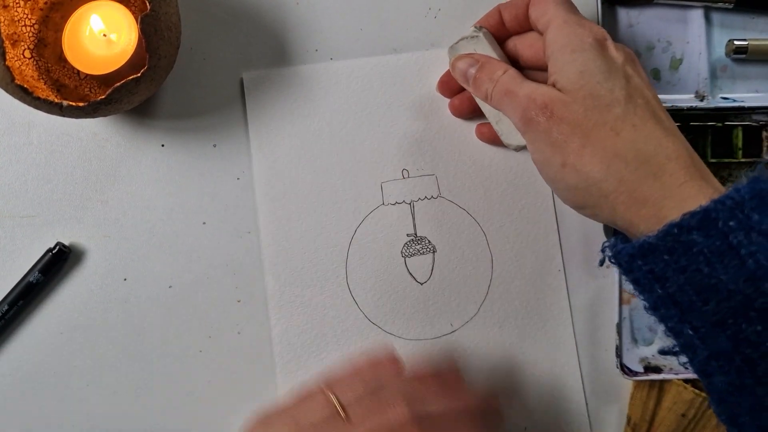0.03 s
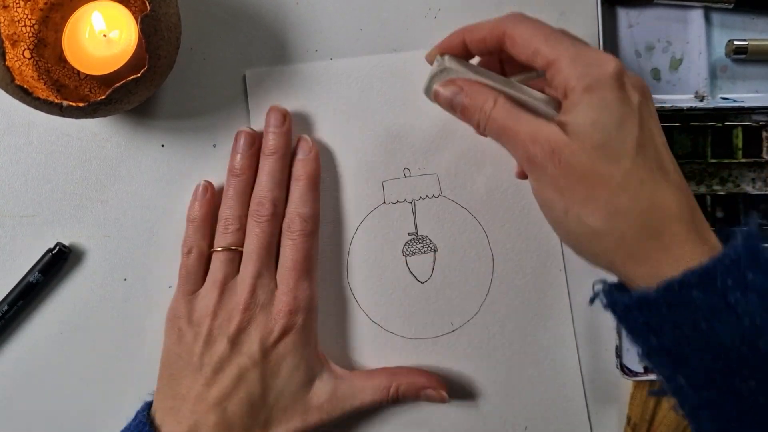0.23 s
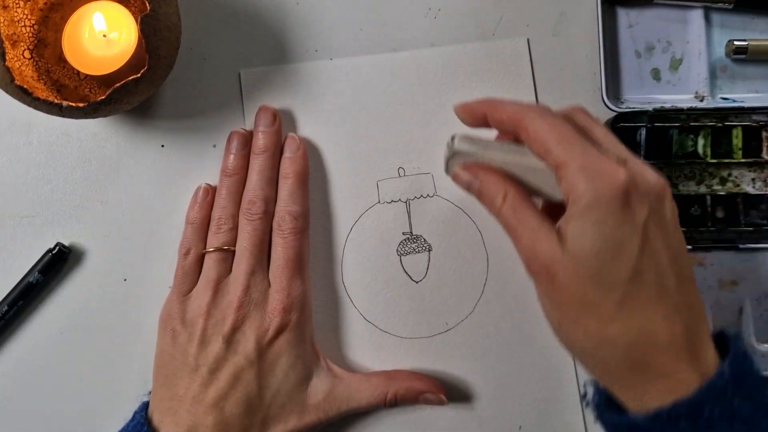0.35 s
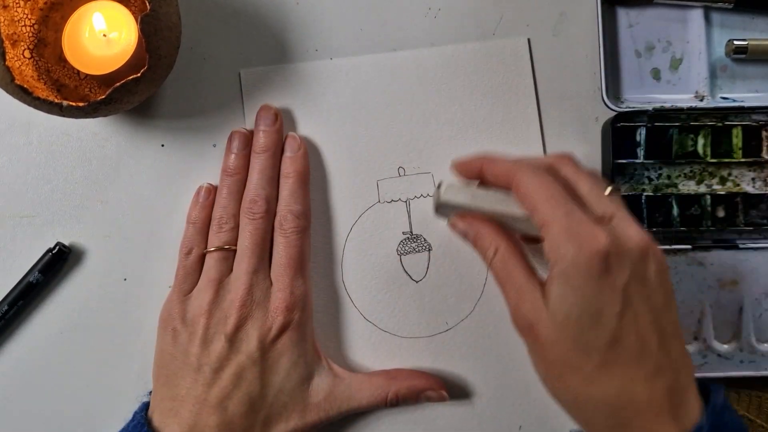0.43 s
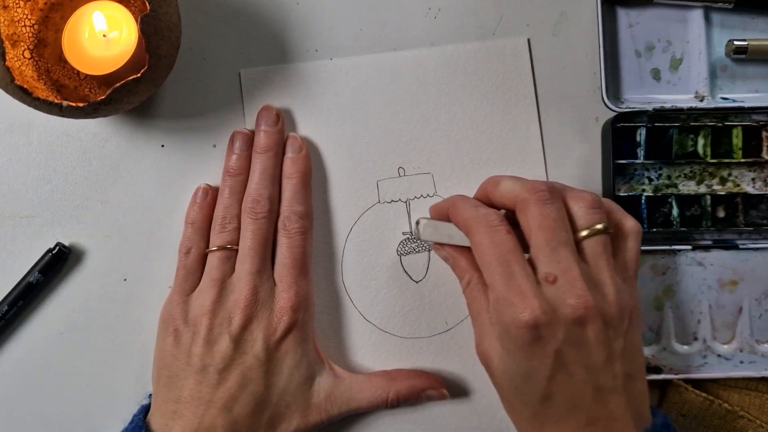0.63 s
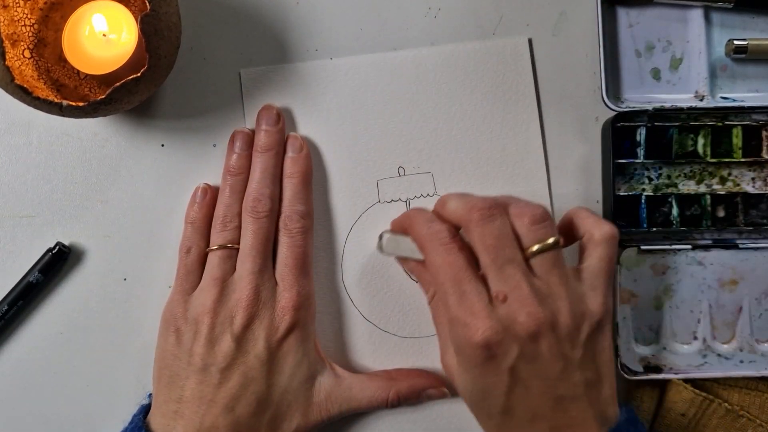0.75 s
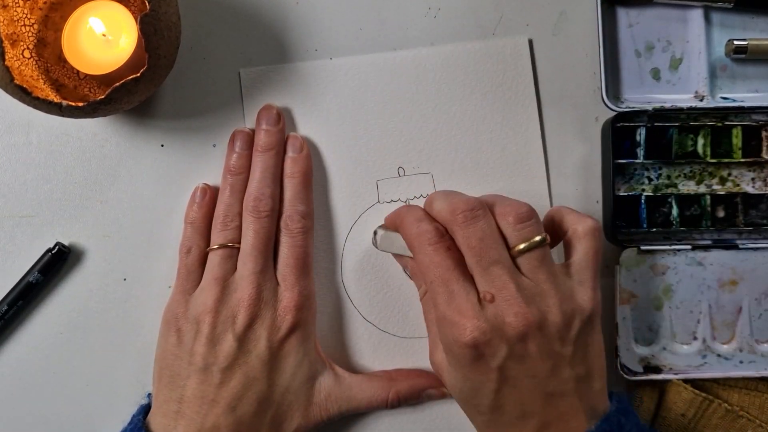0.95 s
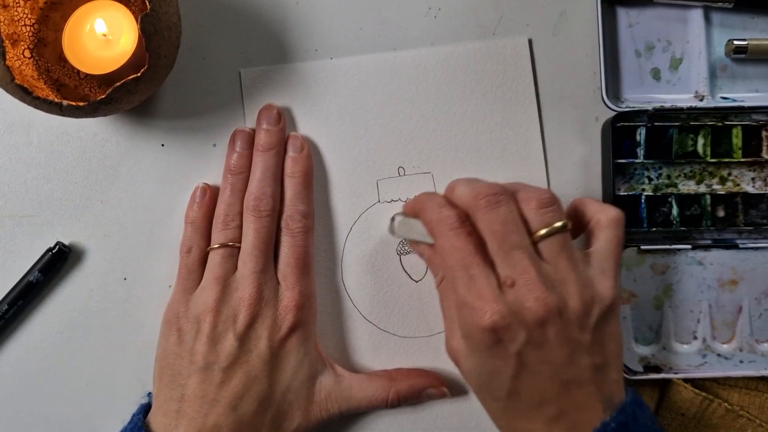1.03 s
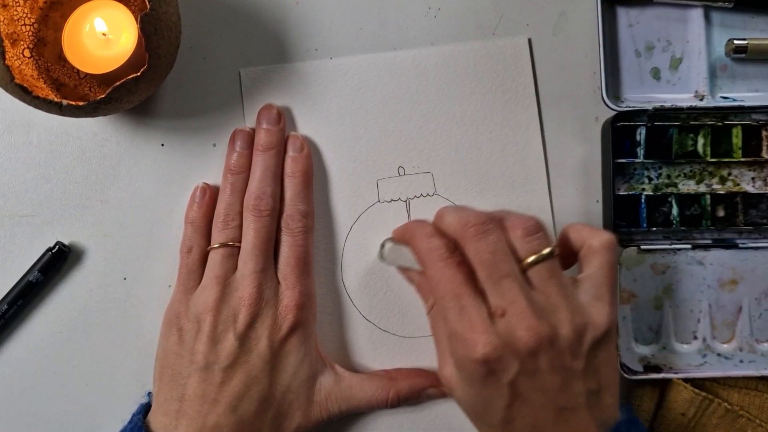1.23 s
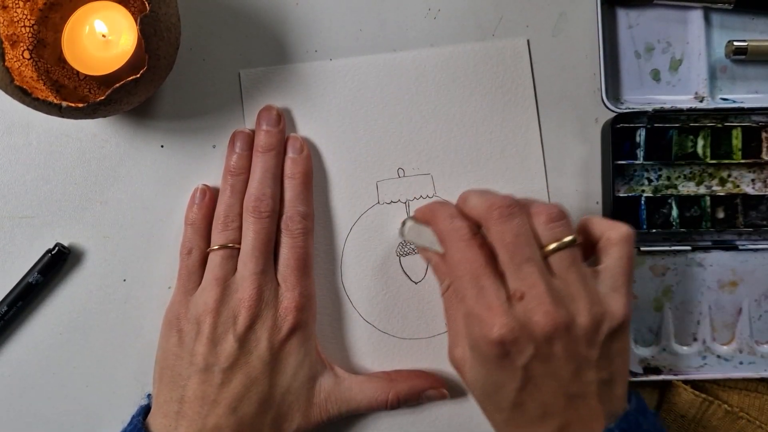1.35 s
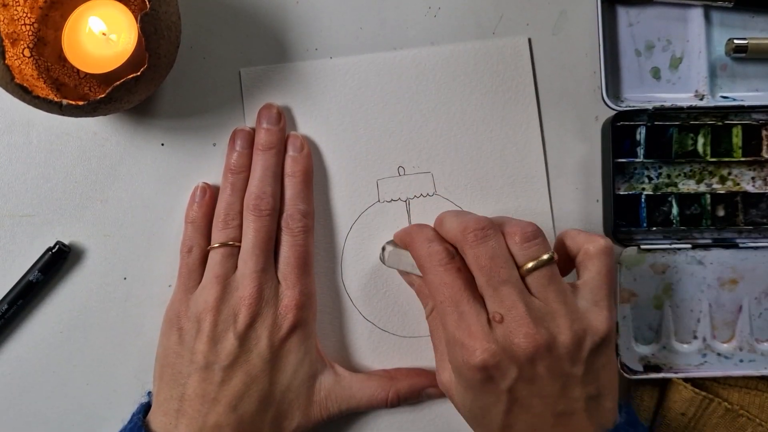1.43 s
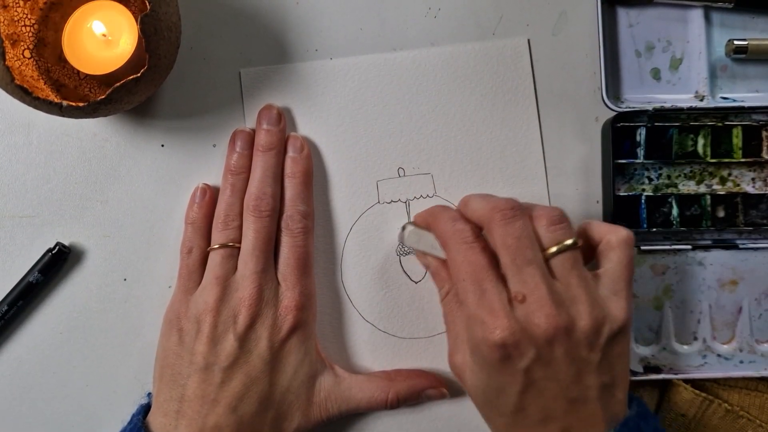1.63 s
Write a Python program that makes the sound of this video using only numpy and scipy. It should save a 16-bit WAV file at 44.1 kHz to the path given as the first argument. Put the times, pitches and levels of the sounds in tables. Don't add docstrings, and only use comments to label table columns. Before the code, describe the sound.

An eraser rubs thick paper, close up in a quiet furnished room with faint low noise. After near silence, a brief scuff leads to a sharp, ringing knock on the desk at 0.24 s, with a weaker bounce at 0.31. A hand scuffs paper at 0.44. From 0.65 to 1.66, short soft hisses alternate bright and dull, with paper rustle, ticks, low desk thumps and a faint creak around 1.4.

```python
import sys
import numpy as np
from scipy import signal
from scipy.fft import rfft, irfft, next_fast_len
from scipy.io import wavfile
from scipy.ndimage import uniform_filter1d

SR = 44100
rng = np.random.default_rng(int(sys.argv[2]) if len(sys.argv) > 2 else 0)


def dump_mix(stems):
    frames = np.atleast_2d(stems).T
    limited = np.clip(frames, -1, 1)
    pcm = np.round(limited * 32767).astype(np.int16)
    wavfile.write(sys.argv[1], SR, pcm)


def invert_db(x):
    u = np.asarray(x, float) / 20
    return 10 ** u


N = 74970
GRAINS_PER_S = 20000


def rms_one(x):
    return x / np.sqrt(np.mean(x ** 2) + 1e-20)


def even(x, size):
    evenness = 0.4
    power = uniform_filter1d(x ** 2, size) + 1e-3
    return rms_one(x / power ** (evenness / 2))


def at_hz(points, hz):
    table_hz, values = np.transpose(points)
    return np.interp(np.log(hz + 1), np.log(table_hz), values)


def colour(x, spectrum, peaks=()):
    hz = np.arange(N // 2 + 1) * SR / N
    lift = 1 + sum(invert_db(db) / (1 + (2 * (hz - f) / width) ** 2) for f, width, db in peaks)
    return rms_one(irfft(rfft(x) * invert_db(at_hz(spectrum, hz)) * lift, N))


def ring(x, hz, t60):
    radius = invert_db(-60 / (t60 * SR))
    angle = 2 * np.pi * hz / SR
    return signal.lfilter([0, np.sin(angle)], [1, -2 * radius * np.cos(angle), radius ** 2], x + 1e-18)


def click(s, db):
    return invert_db(db) * (np.arange(N) == int(s * SR))


def hump(start, peak, end, db, roundness=0.91):
    phase = np.interp(np.arange(N) / SR, [start, peak, end], [0, np.pi / 2, np.pi])
    return invert_db(db) * np.sin(phase).clip(0) ** roundness


def grains(per_s):
    spread_db = 1.5
    slips = (rng.random(N) < per_s / SR) * rng.choice([-1, 1], N)
    return slips * invert_db(spread_db * np.minimum(rng.exponential(1, N), 5))


def flutter(depth_db, count=300):
    steps = N // count + 2
    return invert_db(depth_db * np.interp(np.arange(N) / count, np.arange(steps), rng.standard_normal(steps)))


def slides(rows, source, split_hz):
    top = signal.sosfiltfilt(signal.butter(3, split_hz, "high", fs=SR, output="sos"), source)
    return sum(hump(start, peak, end, db, roundness=0.7) * (source + (invert_db(bright_db) - 1) * top)
               for start, peak, end, db, bright_db in rows)


def room_echo():
    # (f/Hz, t60/s)
    room_t60 = [(200, 0.4), (1000, 0.3), (3000, 0.23), (12000, 0.12)]
    early_s = 0.0017
    t = np.arange(SR // 2) / SR
    edges = 420 * 2 ** np.arange(0, 5.6, 0.5)
    out = 0
    for low, high in zip(edges, edges[1:]):
        band_pass = signal.butter(2, [low, high], "band", fs=SR, output="sos")
        band = signal.sosfilt(band_pass, rng.standard_normal((2, len(t))))
        out = out + band * 1000. ** (-t / at_hz(room_t60, np.sqrt(low * high)))
    out = out * (1 - np.exp(-t / early_s))
    return out / np.sqrt(np.mean(np.sum(out ** 2, axis=1)))


def place(x, phase, pan, wet_db, room):
    size = next_fast_len(2 * N)
    hz = np.arange(size // 2 + 1) * SR / size
    half = invert_db(at_hz(pan, hz) / 2) * np.exp(0.5j * at_hz(phase, hz))
    paths = np.array([half, 1 / half]) + invert_db(wet_db) * rfft(room, size)
    return irfft(rfft(x, size) * paths, size)[:, :N]


def floor():
    # (f/Hz, level/dB per Hz)
    floor_spectrum = [(59, -28.5), (100, 7.5), (197, -4.5), (365, 0.5), (461, -4.5), (3190, -11),
                      (4290, -17.5), (8640, -27), (16000, -51.5)]
    # (f/Hz, side minus mid/dB)
    floor_side = [(150, -1.5), (400, -3), (1000, 0.5)]
    # (f/Hz, level/dB)
    hum = [(355, -87.5), (1068, -88.5)]
    mid, side = rfft(colour(rng.standard_normal((2, N)), floor_spectrum))
    side = side * invert_db(at_hz(floor_side, np.arange(N // 2 + 1) * SR / N))
    noise = irfft(mid + side * [[1], [-1]], N)
    tones = sum(invert_db(db) * np.sin(2 * np.pi * hz * np.arange(N) / SR) for hz, db in hum)
    return invert_db(-76) * noise + tones


def desk():
    # (t/s, level/dB)
    rumble_level = [(0, -75.5), (.22, -70), (0.269, -51), (0.329, -59.5), (.5, -71.5), (.7, -68.5),
                    (.9, -66.5), (1.1, -70.5), (1.3, -68.5), (1.38, -59.5), (1.53, -72), (1.661, -61.5),
                    (1.7, -60)]
    # (f/Hz, level/dB per Hz)
    rumble_shape = [(7.1, -28), (12, -4.5), (54, 7.5), (65, 5), (86, -9), (130, -25.5), (170, -67.5),
                    (290, -120)]
    # (start t/s, peak t/s, end t/s, level/dB, bass lift/dB)
    shakes = [
        (0.241, 0.252, 0.31, -51.5, -3),
        (0.423, 0.43, 0.79, -71.5, -13),
        (0.677, 0.68, 0.76, -71.5, 1.1),
        (0.799, 0.828, 0.82, -71.5, 5),
        (.92, 0.94, 1.14, -77, -5),
        (1.123, 1.155, 1.207, -62, 6.5),
        (1.305, 1.305, 1.335, -63, 5),
        (1.336, 1.41, 1.483, -63, 2),
        (1.593, 1.598, 1.73, -67.5, -0.5),
        (1.208, 1.223, 1.21, -74, 1.5),
    ]
    # (f/Hz, level/dB per Hz)
    wood_spectrum = [(50, -32.5), (90, -10.5), (175, 3.5), (225, -6), (270, -2), (358, 4.5), (420, -19.5),
                     (900, -86)]
    wood = even(colour(rng.standard_normal(N), wood_spectrum), size=600)
    deep = signal.sosfiltfilt(signal.butter(3, 230, fs=SR, output="sos"), wood)
    shake = sum(hump(start, peak, end, db, roundness=0.8) * (wood + (invert_db(deep_db) - 1) * deep)
                for start, peak, end, db, deep_db in shakes)
    s, db = np.transpose(rumble_level)
    level = invert_db(np.interp(np.arange(N) / SR, s, db))
    mid, side = level * colour(rng.standard_normal((2, N)), rumble_shape)
    return shake + mid + invert_db(-17) * side * [[1], [-1]]


def scuffs():
    # (start t/s, peak t/s, end t/s, level/dB, brightness/dB)
    moves = [
        (0.13, .15, 0.17, -73.5, 14),
        (0.44, 0.443, 0.5, -54, -2.5),
        (.225, .228, 0.26, -56.5, -6.5),
    ]
    # (f/Hz, level/dB per Hz)
    scuff_spectrum = [(500, -19), (1000, 0), (3000, -1), (5000, -5), (9000, -9.5), (13300, -17.5),
                      (16000, -15)]
    # (f/Hz, width/Hz, level/dB)
    scuff_peaks = [(3049, 95, 3), (4660, 220, 6), (6690, 220, 8.5), (13200, 300, 5), (705, 70, 16.5),
                   (1083, 50, 6.5), (5650, 120, 4)]
    return slides(moves, colour(grains(GRAINS_PER_S / 2), scuff_spectrum, scuff_peaks), 7000)


def small_ticks():
    # (t/s, level/dB, f/Hz, t60/s)
    ticks = [(.233, -54, 1850, .009), (.4535, -56, 1100, .012), (.4845, -57, 1550, .012),
             (.5972, -52, 2800, .0015), (.5974, -62, 1120, .02), (.598, -72, 4400, .02),
             (1.116, -49.5, 150, .06), (1.3025, -46, 1336, .03), (1.3026, -54, 420, .012),
             (1.303, -55, 3300, .023), (1.3415, -56, 1560, .03), (1.342, -54, 7250, .0035),
             (1.596, -48, 77, .09), (1.6, -70, 8600, .03)]
    return sum(ring(click(s, db), hz, t60) for s, db, hz, t60 in ticks)


def dropped_object():
    # (f/Hz, level/dB, t60/s)
    drop_modes = [(725, -18, 0.4), (1065.7, -15.5, 0.74), (1371.4, 2, 0.12), (1492, 1.5, 0.02),
                  (1714, -8.5, 0.069), (2017, 3.5, 0.1), (2230, -3.5, 0.026), (2692, -1, 0.098),
                  (3200, -5.5, 0.083), (3380, -10.5, 0.0677), (4153, -11.5, 0.034), (4700, -16, 0.056),
                  (6306, -26, .04), (11570, -36.5, .05)]
    # (f/Hz, level/dB, t60/s)
    bounce_modes = [(697, -20, 0.1), (911, -13.5, 0.092), (1070, -13, 0.2), (1490, -3.5, 0.035),
                    (2091, 3.5, 0.044), (2446, -5.5, .055), (2930, -8.5, 0.041), (3460, -12.5, 0.051),
                    (4020, -15, 0.046), (4530, -20, 0.043), (5880, -22.5, 0.055)]
    # (delay t/s, level/dB)
    drop_chatter = [(0, -7.5), (.0014, -2), (.004, -0.5), (.0072, -7.5), (.015, -1.5), (0.0183, -3.5)]
    # (delay t/s, level/dB)
    bounce_chatter = [(0, -6), (.0025, -0.5), (.005, -3), (.0165, -7)]
    # (f/Hz, level/dB per Hz)
    crack_spectrum = [(120, -58), (300, -18.5), (700, -19), (1150, -6), (1700, -2.5), (2700, -5.5),
                      (4600, -14.5), (5400, -21.5), (13500, -33), (16000, -43)]
    crack_t60_s, wobble_db = 0.099, 2
    # t/s, level/dB, modes, crack level/dB, rattle
    contacts = ((0.239, -31.5, drop_modes, -23, drop_chatter),
                (0.3102, -34.5, bounce_modes, -44, bounce_chatter))
    t = np.arange(N) / SR
    crack = colour(rng.standard_normal(N), crack_spectrum)
    out = 0
    for s, db, modes, crack_db, chatter in contacts:
        for hz, mode_db, t60 in modes:
            hits = sum(click(s + late + rng.uniform(0, 0.00033), db + mode_db + loss_db + rng.normal(0, 1.39))
                       for late, loss_db in chatter)
            out = out + ring(hits, hz, t60) * flutter(wobble_db, count=250)
        out = out + invert_db(crack_db) * crack * (t >= s) * 1000. ** (-np.abs(t - s) / crack_t60_s)
    return out


def rustle():
    # (start t/s, peak t/s, end t/s, level/dB)
    rustles = [
        (0.939, 0.968, 1, -63.5),
        (0.49, 0.61, 0.717, -74.5),
        (1.33, 1.334, 1.515, -71.5),
    ]
    # (f/Hz, width/Hz, level/dB)
    edge_peaks = [(569, 25, -8), (951, 19, 2.5), (1220, 30, -9), (1368, 26, -1.5), (1663, 17, -1),
                  (2164, 144, -3)]
    spectrum = [(250, -55.5), (500, 5.5), (2500, -2.5), (6000, -58)]   # (f/Hz, level/dB per Hz)
    peaks = [(f, 2 * width, 12.5 + db) for f, width, db in edge_peaks]
    edge = colour(grains(GRAINS_PER_S / 4), spectrum, peaks)
    return sum(hump(*row) for row in rustles) * edge


def strokes():
    # (start t/s, peak t/s, end t/s, level/dB, brightness/dB)
    rubs = [
        (0.651, 0.674, 0.74, -63, 3.5),
        (0.762, 0.829, 0.85, -63.5, 7),
        (.892, 0.913, 1, -67.5, 0.5),
        (1.009, 1.051, 1.098, -67, 8.5),
        (1.114, 1.14, 1.203, -63, -11.5),
        (1.24, 1.294, 1.324, -66.5, 10.5),
        (1.344, 1.38, 1.434, -63.5, -6),
        (1.48, 1.519, 1.556, -68, 9),
        (1.591, 1.647, 1.66, -67, -15),
    ]
    # (f/Hz, level/dB per Hz)
    paper = [(710, -36), (1200, -13.5), (1610, -15), (2760, -8.5), (2980, -8), (4360, -5), (4960, -6),
             (5410, -5), (16000, -32)]
    # (f/Hz, width/Hz, level/dB)
    sheet = [(4410, 280, 2.5), (5420, 150, 4.5), (6800, 80, -1), (7850, 170, 4.5), (9540, 200, 1),
             (2730, 43, -9), (4066, 54, 1), (5230, 64, 2), (6120, 70, -3), (8680, 90, 5)]
    shift, change_db = 0.015, 3.5
    slips = grains(GRAINS_PER_S) * flutter(1.5)
    out = 0
    for row in rubs:
        chance = rng.standard_normal((len(sheet), 2))
        peaks = [(f * (1 + shift * a), width, db + change_db * b)
                 for (f, width, db), (a, b) in zip(sheet, chance)]
        out = out + slides([row], colour(slips, paper, peaks), 10000)
    return out


def creak():
    # (t/s, level/dB, f/Hz)
    creak_path = [
        (1.332, -85, 1401),
        (1.341, -59, 1498),
        (1.377, -64.5, 1482),
        (1.408, -58, 1602),
        (1.442, -63.5, 1534),
        (1.489, -67, 1660),
        (1.502, -67.5, 1658),
        (1.52, -90, 1780),
    ]
    width_hz, low_hz, low_db = 230, 741, -9.5
    s, db, hz = np.transpose(creak_path)
    t = np.arange(N) / SR
    slips = rng.standard_normal((2, N))
    radius = np.exp(-np.pi * width_hz / SR)
    narrow = signal.lfilter([1], [1, -2 * radius, radius ** 2], slips[0] + 1j * slips[1])
    high = (narrow * np.exp(2j * np.pi * np.cumsum(np.interp(t, s, hz)) / SR)).real
    low = ring(ring(slips[0], low_hz, 0.015), low_hz, 0.016)
    level = invert_db(np.interp(t, s, db, left=-150, right=-150))
    return level * (even(rms_one(high), size=300) + invert_db(low_db) * rms_one(low))


def scene():
    # (f/Hz, left lead/rad)
    drop_phase = [(300, 0.73), (780, -.5), (1200, 1.6), (2150, -0.6), (2700, 0), (5700, -2), (16000, 6)]
    rub_phase = [(300, 0.05), (600, 0.92), (2800, 1.14), (5400, 1.31), (16000, 2)]
    # (f/Hz, left minus right/dB)
    drop_pan = [(1200, -0.2), (2500, 10.5), (14000, -7.5)]
    rub_pan = [(1000, 5), (5000, 2.7), (14000, -3.5)]
    room = room_echo()
    near = scuffs() + small_ticks() + rustle() + strokes() + creak()
    drop = place(dropped_object(), drop_phase, drop_pan, -5.5, room)
    return drop + place(near, rub_phase, rub_pan, -7.5, room) + desk() + floor()


def low_pass(x):
    return signal.sosfilt(signal.butter(12, 16450, fs=SR, output="sos"), x)


def record(dry):
    mix = signal.sosfilt(signal.cheby2(12, 50, 16000, fs=SR, output="sos"), dry)
    return low_pass(mix)


dry = scene()
out = record(dry)
dump_mix(out)
```